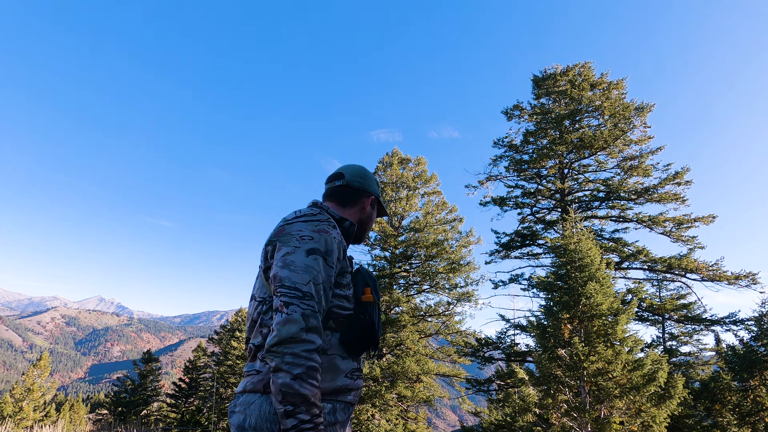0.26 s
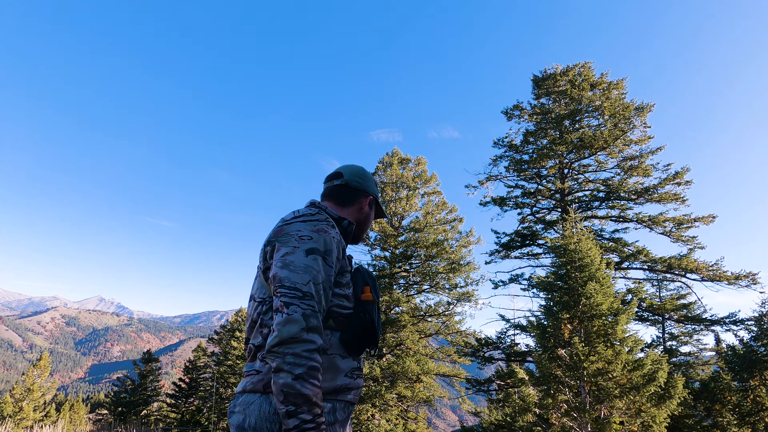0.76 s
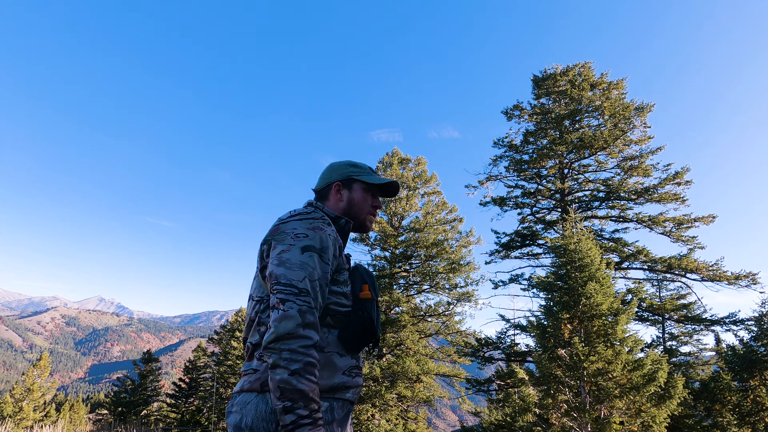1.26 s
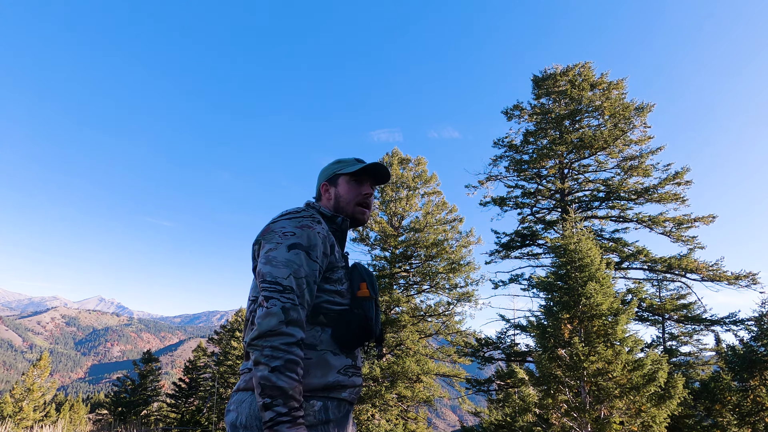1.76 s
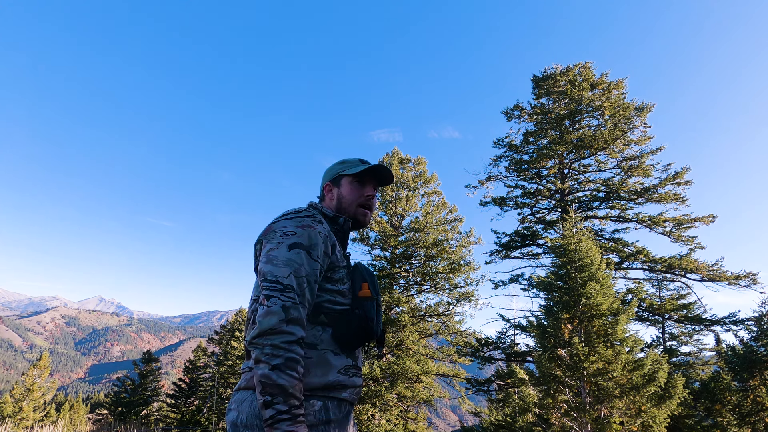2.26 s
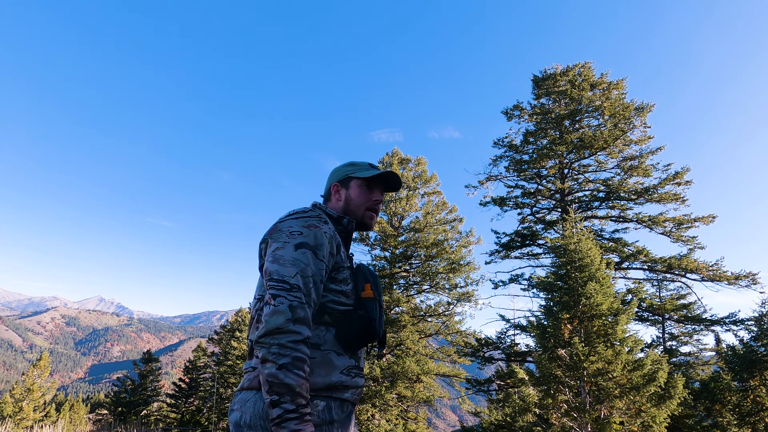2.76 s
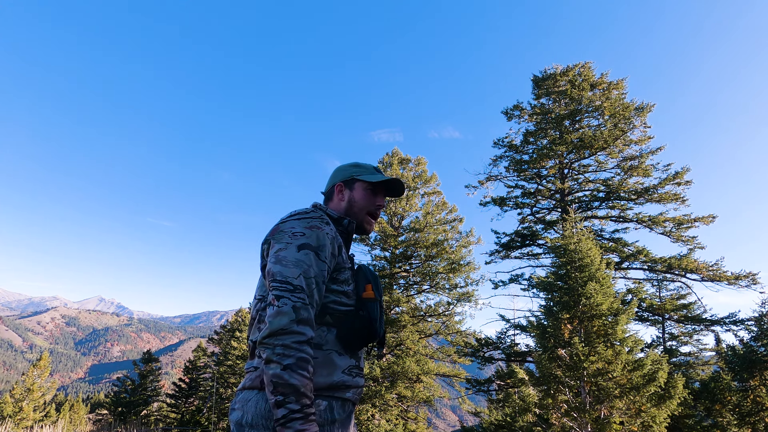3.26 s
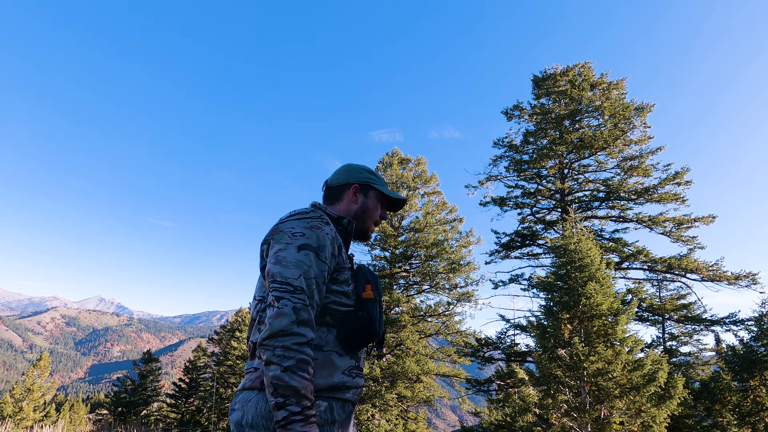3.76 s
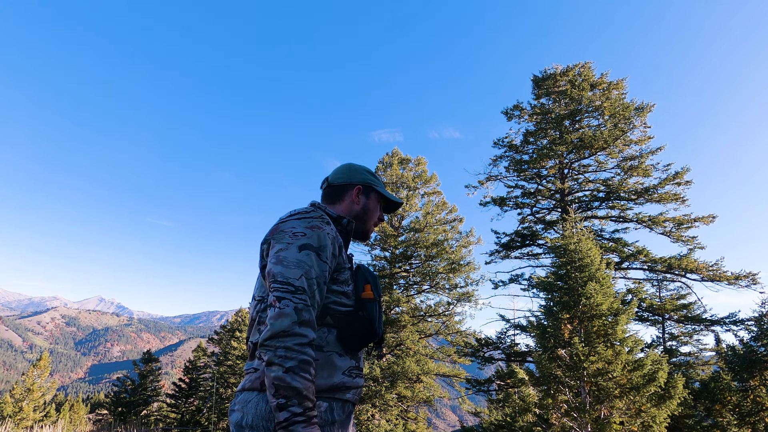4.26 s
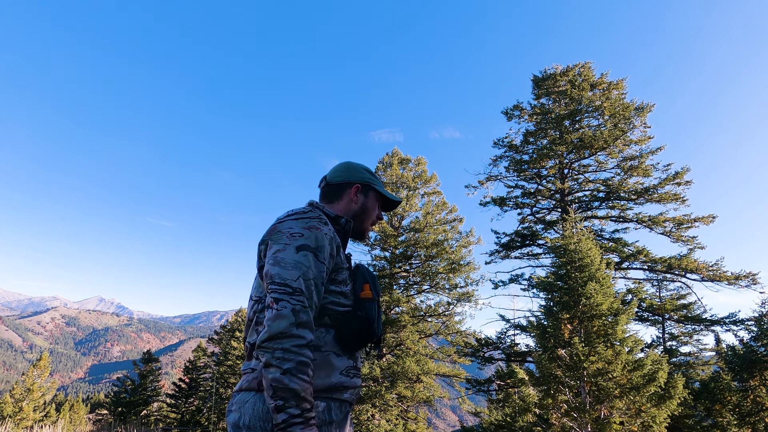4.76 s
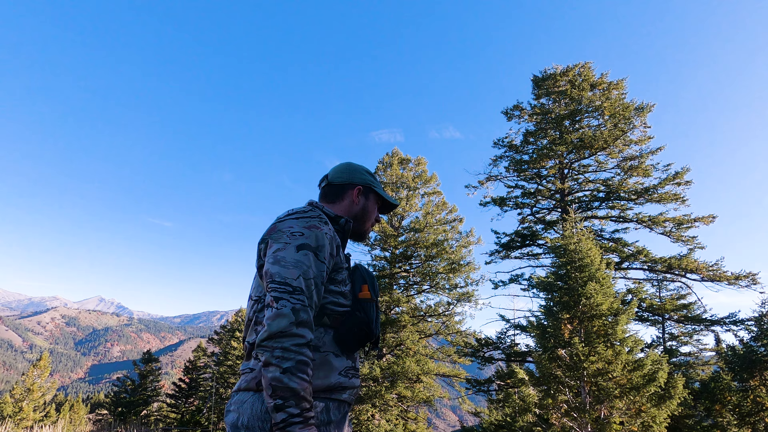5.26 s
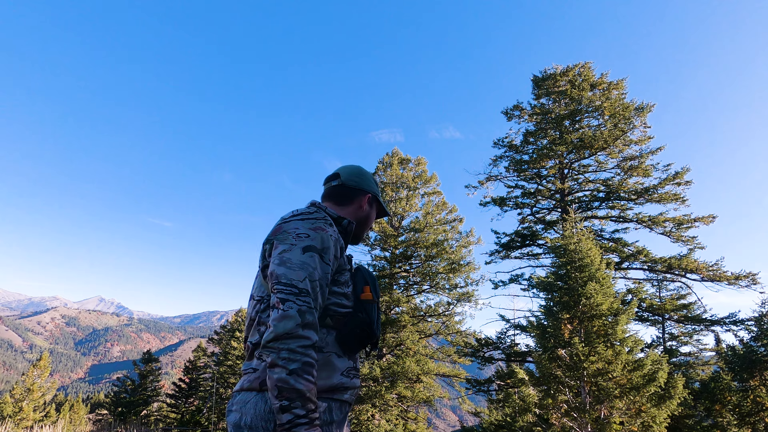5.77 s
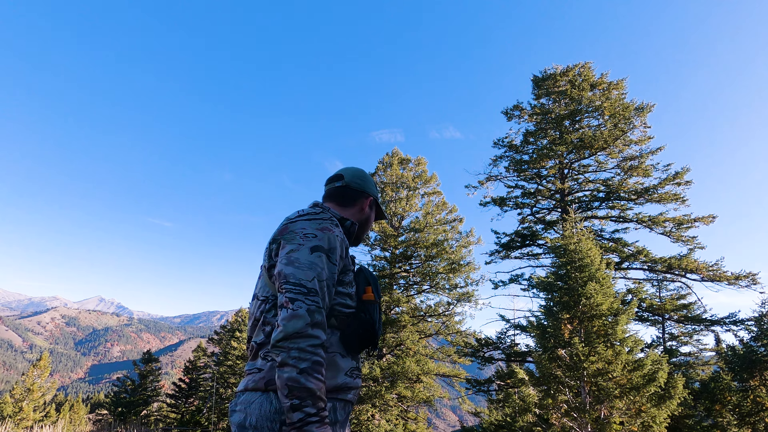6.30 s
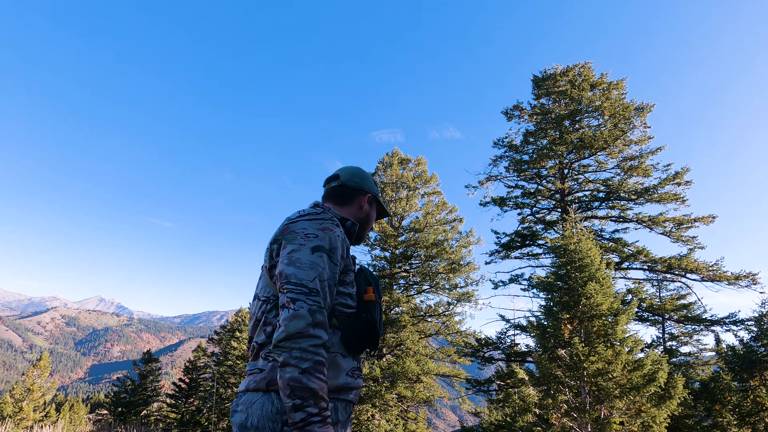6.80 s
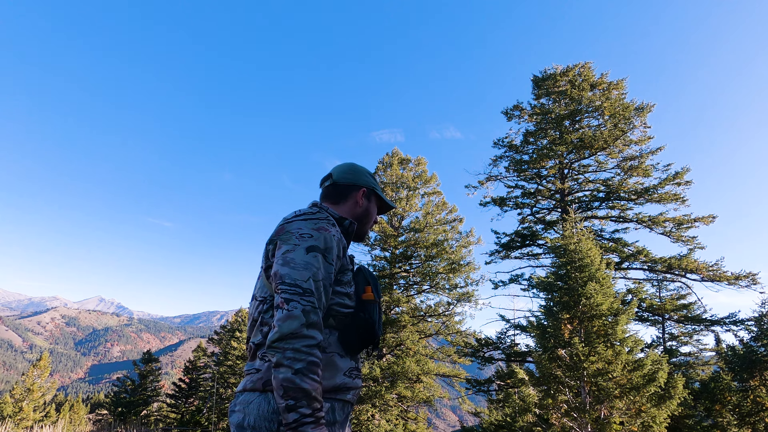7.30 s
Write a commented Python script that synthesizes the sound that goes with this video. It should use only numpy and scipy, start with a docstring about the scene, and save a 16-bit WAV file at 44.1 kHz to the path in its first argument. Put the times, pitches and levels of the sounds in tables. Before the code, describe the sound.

A hunter blows five loud, nasal elk-like mews on a mouth reed, each sliding from high to low, over faint mountain wind.

```python
"""Open mountain slope: a latex reed held in the mouth gives five falling mews.
Each is a harmonic series shaped by the resonance of the mouth, with turbulent air leaking past the reed.
Sputters, wet crackles and dry clicks, made of short rings and noise bursts, go before or between the notes;
one burst of the same make marks the first catch of the reed. The ground returns delayed copies, the trees a
scattered echo. Gliding bird whistles and a wind of random spectra lie beneath; a gain control ducks the whole."""
import sys
import numpy as np
from scipy import signal
from scipy.fft import rfft, irfft
from scipy.io import wavfile
from scipy.ndimage import uniform_filter1d

SR = 44100
rng = np.random.default_rng(int(sys.argv[2]) if len(sys.argv) > 2 else 0)


def bounce(signal):
    """Save signal as a 16-bit WAV file at the path given by the first command-line argument."""
    frames = np.transpose(np.atleast_2d(signal))
    limited = np.clip(frames, -1, 1)
    pcm = np.round(limited * 32767).astype(np.int16)
    wavfile.write(sys.argv[1], SR, pcm)


N = 332514  # samples

# Course of each mew; the second note breaks and starts again, so it takes two tables:
# t/s, pitch f/Hz, level/dB before the common raise, softness of the reed's beat/(dB per octave of partials)
MEW_COURSES = [
    [(2.075, 1210, -12, -3.5), (2.097, 1373, -15.5, -3.5), (2.119, 1412, -13.5, -4.5),
     (2.221, 1393, -18.5, -1), (2.271, 1320, -15, -2.5), (2.3, 1201, -15, 1), (2.339, 1002, -12.5, -1),
     (2.449, 613, -18.5, 3), (2.495, 480, -22, 7.5), (2.535, 358.5, -28, 6.5), (2.573, 252, -41.5, -0.5),
     (2.6, 208, -60, 14)],
    [(3.21, 1570, -32, 0), (3.224, 1496, -14, 1), (3.28, 1547, -11.5, 5.5), (3.34, 1678, -14, -0.5),
     (3.408, 1783, -10, 11), (3.435, 1644, -29, -3)],
    [(3.435, 1625, -24, -2), (3.447, 1525, -21, 4), (3.462, 1796, -12.5, 5), (3.478, 1755, -9.5, 13.5),
     (3.493, 1670, -17.5, 1.5), (3.515, 1580, -13.5, 3), (3.55, 1375, -15, 1), (3.59, 1321, -16.5, -0.5),
     (3.631, 1185, -16, 1), (3.735, 813, -16.5, 3.5), (3.777, 730.4, -17, -1), (3.903, 597, -20, 0),
     (3.959, 540, -24, -1.5), (4.009, 443, -31, 0.5), (4.035, 415, -45.5, -0.5), (4.055, 397.4, -56, 0)],
    [(4.742, 1050, -32, -4), (4.754, 1120, -14.5, 1.5), (4.798, 1348, -15, 3.5), (4.862, 1412, -8, 7),
     (4.924, 1529, -12, 3), (5.032, 1535, -14.5, 3), (5.13, 1189, -16, 3.5), (5.16, 964, -21, 7),
     (5.222, 578.6, -20, 3), (5.246, 426.5, -25.5, 7.5), (5.272, 346.4, -33, 4), (5.316, 245.4, -42, 0),
     (5.36, 208.4, -70, -4)],
    [(5.938, 1740, -42.5, 14), (5.955, 1525, -27, 2), (5.99, 1461, -9, 4.5), (6.06, 1518, -14, 4),
     (6.12, 1666, -9.5, 3), (6.188, 1577, -13.5, 3.5), (6.27, 1412, -12, 4), (6.3, 1293, -19.5, 5),
     (6.326, 1161, -16, 3.5), (6.41, 957, -15, 8), (6.474, 826, -20, 6), (6.58, 753, -21, 9),
     (6.64, 694.4, -16.5, 3.5), (6.75, 625.5, -19.5, 5.5), (6.795, 532, -24, 3.5), (6.818, 455.6, -30.5, 7),
     (6.88, 290, -54.5, -0.5)],
    [(7.092, 1490, -30.5, -1.5), (7.126, 1462, -10, 1), (7.25, 1630, -13, -1.5), (7.3, 1559, -14.5, -1),
     (7.332, 1377, -14.5, -1.5), (7.362, 1055, -18, 0), (7.386, 776, -16, 3.5), (7.444, 517, -20, 8.5),
     (7.468, 394, -29.5, 10), (7.488, 299, -36.5, 7), (7.54, 188, -51.5, -5.5)],
]
# How each mew is held, taut at high pitch and slack at low: mouth factor on f (1) taut, slack;
# stress on 1st partial/dB taut, slack; on 2nd/dB taut, slack;
# leaking air re the note, as the reed catches/dB, once sealed/dB; sealing time t/s; treble level/dB
MEW_GRIPS = [(1.044, 1.03, 10, 3, 7.5, -4, -17.5, -35, 0.081, -4),
             (0.98, 0.98, 1, 0.5, 0.5, 1.5, -19, -26.5, 0.039, -2),
             (1.018, 0.99, -2.5, 15.5, -3, 2, -23, -32, .12, -0.5),
             (1.006, 0.96, -2.5, 7.5, -4.5, 3.5, -15.5, -35.5, .03, 0.5),
             (0.88, 0.84, -6.5, 2, -8.5, 0, -45, -38.5, 0.054, -2.5),
             (0.95, 0.95, 7.5, -3, 0, -6, -28.5, -34.5, .04, -0.5)]
# Colour that mouth and lips give the partials: f/Hz, relative level/dB
MOUTH_COLOUR = [(250, -15), (700, -6), (1200, -3.5), (1650, 2.5), (2300, 10.5), (2900, 2.5), (3600, -1.5),
                (4200, -10.5), (5000, -25), (5600, -28), (6800, -33), (7700, -30), (8600, -41.5),
                (10000, -39), (12500, -44.5), (14500, -58.5)]
# Spectrum of the leaking air: f/Hz, relative level/dB
AIR_COLOUR = [(290, -39.5), (500, -33.5), (770, -42.5), (2350, -3), (3990, -15.5), (5280, -32.5),
              (7580, -27.5), (8590, -44), (10200, -53.5), (14000, -84.5)]
# Sputtering at the wet reed: start t/s, length t/s, level/dB before its swell
SPUTTERS = [(1.661, .03, -49.5), (1.792, 0.043, -59), (2.005, 0.023, -44.5), (2.032, 0.1, -26),
            (2.847, 0.068, -53), (2.932, 0.031, -63), (3.179, .035, -42.5), (4.531, .03, -56),
            (4.71, .035, -40), (7.065, 0.024, -54)]
# Short bursts at the reed: louder wet crackles, except that the one at 2.0787 s is the burst
# as the reed catches and the first mew starts: t/s, level/dB, main ring f/Hz
REED_BURSTS = [(0.0522, -37, 1710), (1.5716, -36.5, 3720), (1.601, -41, 3360), (1.665, -33, 3590),
               (1.6702, -30, 3330), (1.6999, -38, 2330), (1.7185, -39, 2190), (1.735, -37, 2160),
               (1.8162, -40.5, 2230), (2.0183, -34, 2540), (2.028, -15.5, 2480), (2.0384, -16, 2080),
               (2.0502, -10.5, 2230), (2.0591, -7.5, 1880), (2.0787, -2.5, 2370), (2.8573, -34, 2180),
               (2.8828, -34, 2240), (2.9517, -41.5, 3570), (4.5417, -35.5, 2050), (4.7337, -26.5, 2110)]
# Dry clicks of tongue or lips: t/s, level/dB before the band filter, lower band edge f/Hz
DRY_CLICKS = [(1.667, -47, 3000), (2.028, -38, 4000), (2.59, -29.5, 1200), (2.6294, -36, 6540),
              (3.1823, -62, 1490), (4.5094, -54, 5030), (4.702, -37, 2560), (5.3795, -42, 7054),
              (5.838, -60, 1210), (5.905, -52, 1200), (7.0414, -41, 1487)]
# Reflections off ground and rocks: delay t/s, level/dB before the ground's colour
GROUND_BOUNCES = [(.00437, -0.5), (.0087, -19), (.016, -8)]
# Colour of the ground reflection: f/Hz, level/dB
GROUND_COLOUR = [(500, -11), (4000, -10), (9000, -4.5)]
# Colour of the trees' echo: f/Hz, relative level/dB
TREE_COLOUR = [(300, -8.5), (1000, -8), (1500, -3.5), (2400, -1.5), (3200, -7), (4200, -18), (6000, -13),
               (14000, -54)]
# Direction of the caller, level: f/Hz, left minus right level/dB
CALLER_LEAN = [(60, -7), (180, 2), (530, -2), (1600, -1.5), (4760, -0.5), (14200, -12.5)]
# Direction of the caller, phase: f/Hz, lead of left (rad)
CALLER_LEAD = [(0, -0.058), (3900, -0.92), (7000, -1.53), (10000, -1.3), (14500, -2.2)]
# Bird chips: start t/s, length t/s, first f/Hz, middle f/Hz, last f/Hz, level/dB before flutter and blur
BIRD_CHIPS = [(0.63, .065, 6600, 6950, 5030, -67), (0.888, 0.071, 7300, 7310, 4600, -60.5),
              (1.5, .3, 8100, 7770, 7500, -69.5), (1.77, 0.081, 6880, 6650, 5050, -65.5),
              (6.82, .05, 6170, 7100, 7000, -50), (6.887, 0.07, 4370, 6270, 4630, -46),
              (6.986, .05, 4220, 5070, 6930, -44)]
# Spectrum of the wind: f/Hz, relative level/dB
WIND_COLOUR = [(15, -78.5), (25, -30), (47, -44.5), (162, 4), (470, -12.5), (1200, -11), (1880, -11.5),
               (2330, -13.5), (2810, -16), (6590, -28.5), (8150, -37), (13200, -49.5), (14700, -60.5)]
# Likeness of the wind at left and right: f/Hz, correlation (1)
WIND_LIKENESS = [(60, 0.32), (150, 0.12), (370, 0.24), (920, 0.054), (2300, 0.11), (5710, -0.016),
                 (14200, -0.073)]

TAUT_HZ, LOOSE_HZ = 1390, 625  # between these pitches the hold passes from taut to slack
SLACK_HZ, SLACK_LEAK_DB = 1140, 10  # below this pitch the reed leaks more, per octave
# below this pitch the reed no longer snaps shut and the air runs out, per octave
LIMP_HZ, LIMP_SOFT_DB, LIMP_LEAK_DB = 441, 13, -18
RING_HZ, RING_WIDTH_HZ = 2300, 700  # the mouth's main ring delays the partials that pass it
TREBLE_HZ = (4200, 5170)  # the mouth's edge, across which the treble level comes in
SPITS_PER_S, SPIT_HZ = 200, (1960, 2850)  # small crackles in a sputter, range of their main ring
SPIT_DB, SPIT_SPREAD_DB = 8, 5.5  # their level re the sputter, spread either way
TICK_DB, TICK_HZ = -21, (7240, 8300)  # high tick of a burst: level re the burst, band
NOTE_RAISE_DB = 9.0  # before the gain control the notes are far louder than the wind
ECHO_DB, ECHO_T60_S = -38.5, 0.9
WIND_DB = -51.5  # rms before the gain control
BAND_EDGE_HZ = 14600


def mew(course, taut_mouth, slack_mouth, taut_1st_db, slack_1st_db, taut_2nd_db, slack_2nd_db,
        catch_db, sealed_db, seal_s, treble_db):
    """Source and filter: a periodic reed excites harmonics, the mouth weights them, and leaking air hisses."""
    s, (hz, level_db, soft_db) = unrolled(course)
    size = len(hz)
    age = np.arange(size) / SR
    slack = np.interp(np.log(hz), np.log([LOOSE_HZ, TAUT_HZ]), [1, 0])
    limp = np.maximum(np.log2(LIMP_HZ / hz), 0)
    mouth = taut_mouth + (slack_mouth - taut_mouth) * slack

    air_db = sealed_db + (catch_db - sealed_db) * np.exp(-(age / seal_s) ** 2)
    air_db += SLACK_LEAK_DB * np.maximum(np.log2(SLACK_HZ / hz), 0)
    air_db += LIMP_LEAK_DB * limp

    # a leaky reed is unsteady in pitch
    shake = 0.0026 * drift(size, hz=65) + 0.064 * gain_of(air_db) * drift(size, hz=248)
    hz = uniform_filter1d(hz, 500, mode="nearest") * (1 + shake)
    turn = 2 * np.pi * np.cumsum(hz) / SR

    k = np.arange(1, 41)[:, None]  # number of the partial
    partial_hz = k * hz
    soft_db = np.maximum(soft_db, -4) + LIMP_SOFT_DB * limp
    mouth_db = read(MOUTH_COLOUR, partial_hz / np.clip(mouth, .7, 1.4))
    partials = gain_of(mouth_db - soft_db * np.log2(k)) * (partial_hz < SR / 2)
    stress_1st_db = taut_1st_db + (slack_1st_db - taut_1st_db) * slack
    stress_2nd_db = taut_2nd_db + (slack_2nd_db - taut_2nd_db) * slack
    partials[:2] *= gain_of([stress_1st_db, stress_2nd_db])
    partials *= gain_of(np.interp(partial_hz, TREBLE_HZ, [0, treble_db]))
    partials /= np.sqrt((partials ** 2).sum(0) / 2)  # tone of rms 1

    # high partials come and go
    waver_db = np.array([drift(size, hz=24.8) for _ in k]) * np.minimum(0.26 * k ** 1.76, 4.5)
    lag = 2 * np.arctan((partial_hz / mouth - RING_HZ) / RING_WIDTH_HZ)
    tone = -(partials * gain_of(waver_db) * np.cos(k * turn - lag)).sum(0)

    hiss = evened(coloured(rng.standard_normal(size), AIR_COLOUR))
    air = gain_of(air_db + 1.8 * drift(size, hz=150)) * hiss
    fade = np.minimum(1, np.minimum(age, age[::-1]) / 0.0062)
    return s, gain_of(level_db) * (tone + air) * fade


def sputter(s, length, db):
    """Turbulence: an unsteady flow of air gives filtered noise, here swelling between tapered ends."""
    size = round(length * SR)
    air = evened(coloured(rng.standard_normal(size), AIR_COLOUR))
    unsteady = air * gain_of(2.6 * drift(size, hz=300))
    return s, gain_of(db) * unsteady * signal.windows.tukey(size, .4) * np.linspace(.6, 1, size)


def spits(s, length, db):
    """Random events: small film bursts fall at independent times, levels and pitches within a sputter."""
    count = max(round(length * SPITS_PER_S), 1)
    at, size, pitch = rng.random((count, 3)).T
    levels_db = db + SPIT_DB + SPIT_SPREAD_DB * (2 * size - 1)
    return zip(s + length * at, levels_db, np.interp(pitch, [0, 1], SPIT_HZ))


def reed_burst(s, db, hz):
    """Impulse response: a bursting film, or the reed's catch, gives damped rings and a high tick of noise."""
    t = np.arange(500) / SR
    modes = [(hz, 8.5, .011), (3500, -1.5, .012), (2100, -7, .012)]  # f/Hz, level/dB, time to fall 60 dB/s
    ring = sum(gain_of(ring_db - 60 * t / t60) * np.sin(2 * np.pi * f * t) for f, ring_db, t60 in modes)
    onset = 1 - np.exp(-(t / 0.0012) ** 2)
    tick_band = signal.butter(2, TICK_HZ, "bandpass", fs=SR)
    tick = gain_of(TICK_DB - 60 * t / 0.0097) * signal.lfilter(*tick_band, rng.standard_normal(len(t)))
    return s, gain_of(db) * (ring * onset + tick)


def click(s, db, low_hz):
    """Transient: a snap of tongue or lips is a wide band of noise, over in a few ms."""
    t = np.arange(500) / SR
    band = signal.butter(4, [low_hz, 8800], "bandpass", fs=SR, output="sos")
    return s, gain_of(db - 60 * t / 0.0063) * signal.sosfilt(band, rng.standard_normal(len(t)))


def slope(x):
    """Reflection: delayed ground copies comb the sound; trees scatter a late echo, each side its own."""
    bounces = sum(gain_of(db) * delayed(x, s) for s, db in GROUND_BOUNCES)
    near = x + coloured(bounces, GROUND_COLOUR)
    t = np.arange(SR) / SR
    dying = gain_of(-60 * t / ECHO_T60_S)
    rising = 1 - np.exp(-(t / 0.034) ** 2)
    trees = coloured(rng.standard_normal((2, SR)), TREE_COLOUR) * dying * rising
    trees /= np.linalg.norm(trees[0])
    return near + gain_of(ECHO_DB) * signal.fftconvolve(x[None], trees, axes=1)[:, :N]


def placed(sides):
    """Binaural cues: differences of level and phase set the caller a little to the right."""
    left, right = sides
    lead = np.interp(np.fft.rfftfreq(N, 1 / SR), *np.transpose(CALLER_LEAD))
    left = irfft(rfft(left) * np.exp(1j * lead), N)  # the left port is farther
    left = coloured(left, [(hz, db / 2) for hz, db in CALLER_LEAN])
    right = coloured(right, [(hz, -db / 2) for hz, db in CALLER_LEAN])
    return np.array([left, right])


def chip(s, length, first_hz, middle_hz, last_hz, db):
    """Frequency glide and scattering: a whistle follows a parabola of pitch, blurred by branches."""
    u = np.arange(0, 1, 1 / (length * SR))
    hz = first_hz * (1 - u) * (1 - 2 * u)
    hz += middle_hz * 4 * u * (1 - u)
    hz += last_hz * u * (2 * u - 1)
    whistle = np.sin(2 * np.pi * np.cumsum(hz) / SR) * signal.windows.tukey(len(hz), .6)
    fluttering = gain_of(db) * whistle * drift(len(hz), hz=350)
    blur = rng.standard_normal(2500) * gain_of(-60 * np.arange(2500) / SR / 0.15)
    return s, signal.fftconvolve(fluttering, blur / np.linalg.norm(blur))


def wind():
    """Partly coherent noise: random short-time spectra with drifting patches, weaker in the bass."""
    frames, hz = N // 256 + 5, np.fft.rfftfreq(1024, 1 / SR)
    a, b, c, d, patches = rng.standard_normal((frames, 513, 5)).T
    patches = evened(uniform_filter1d(uniform_filter1d(patches, 8, 0), 10, 1))  # over f, then t
    likeness = np.clip(read(WIND_LIKENESS, hz), -1, 1)[:, None]
    left = a + 1j * b
    right = likeness * left + np.sqrt(1 - likeness ** 2) * (c + 1j * d)
    patch_db = (-1.12 + 0.52 * (hz < 300))[:, None] * patches
    spectra = np.array([left, right]) * gain_of(read(WIND_COLOUR, hz)[:, None] + patch_db)
    return gain_of(WIND_DB) * evened(signal.istft(spectra, nperseg=1024, noverlap=768)[1][:, :N])


def gain_of(db):
    """Level: decibels to an amplitude factor."""
    return 10 ** (np.asarray(db) / 20)


def evened(x):
    """Normalisation: scales to rms 1."""
    return x / np.sqrt(np.mean(x ** 2) + 1e-20)


def read(points, hz):
    """Interpolation: reads a spectrum on a log-frequency axis."""
    f, value = np.transpose(points)
    return np.interp(np.log(hz + 1), np.log(f + 1), value)


def coloured(x, points):
    """Linear filtering: multiplies the spectrum by a curve in dB."""
    size = x.shape[-1]
    return irfft(rfft(x) * gain_of(read(points, np.fft.rfftfreq(size, 1 / SR))), size)


def delayed(x, s):
    """Phase shift: a linear phase delays by any fraction of a sample."""
    return irfft(rfft(x) * np.exp(-2j * np.pi * np.fft.rfftfreq(len(x), 1 / SR) * s), len(x))


def drift(size, hz):
    """Low-pass noise: slow random motion of rms 1."""
    return evened(signal.lfilter(*signal.butter(2, hz, fs=SR), rng.standard_normal(size)))


def unrolled(rows):
    """Interpolation: start time and the columns of a table, sample by sample."""
    s, *columns = np.transpose(rows)
    t = np.arange(s[0], s[-1], 1 / SR)
    return s[0], [np.interp(t, s, c) for c in columns]


def add(mix, s, sound):
    """Superposition: adds a sound at its time."""
    part = mix[round(s * SR):][:len(sound)]
    part += sound[:len(part)]


def scene():
    """Superposition: a close caller on the slope, with far birds and wind."""
    caller, birds = np.zeros(N), np.zeros(N)
    for course, grip in zip(MEW_COURSES, MEW_GRIPS):
        add(caller, *mew(course, *grip))
    caller *= gain_of(NOTE_RAISE_DB)
    for row in SPUTTERS:
        add(caller, *sputter(*row))
        for spit in spits(*row):
            add(caller, *reed_burst(*spit))
    for row in REED_BURSTS:
        add(caller, *reed_burst(*row))
    for row in DRY_CLICKS:
        add(caller, *click(*row))
    for row in BIRD_CHIPS:
        add(birds, *chip(*row))
    return placed(slope(caller)) + birds + wind()


def record(dry):
    """Compression: gain falls within a few ms, so onsets overshoot, and recovers slowly; then a band limit."""
    quick, lag = np.exp(-1 / (0.0036 * SR)), np.exp(-1 / (0.0018 * SR))  # time constants in s
    power = signal.lfilter([1 - quick], [1, -quick], (dry ** 2).mean(0))
    power_db = 10 * np.log10(power + 1e-12)
    fall = np.arange(N) * 75.5 / SR  # the held level falls at most 75.5 dB a second
    held_db = np.maximum.accumulate(power_db + fall) - fall
    over_db = np.maximum(held_db + 30.5, 0)  # above a threshold of -30.5 dB
    ducked = dry / gain_of(0.59 * signal.lfilter([1 - lag], [1, -lag], over_db))
    low_pass = signal.firwin(255, BAND_EDGE_HZ, window=("kaiser", 9), fs=SR)
    return signal.oaconvolve(ducked, low_pass[None], "same")


dry = scene()
out = record(dry)
bounce(out)
```